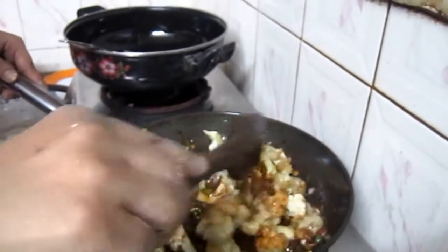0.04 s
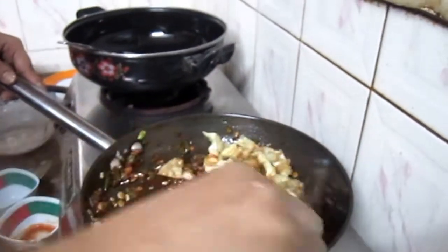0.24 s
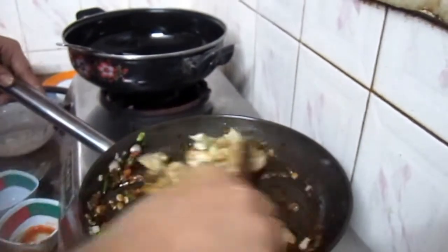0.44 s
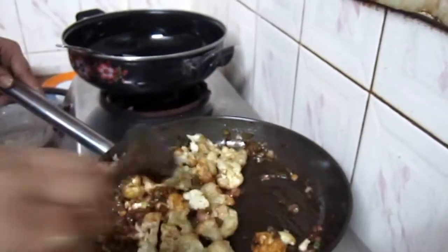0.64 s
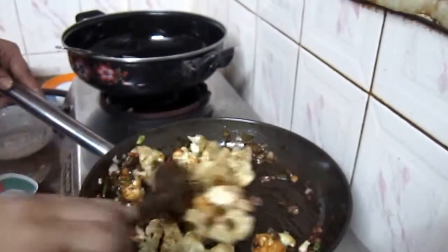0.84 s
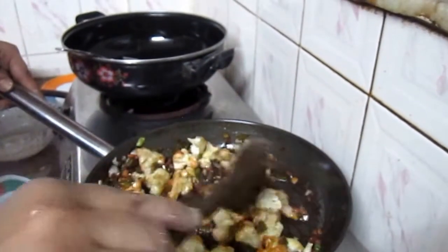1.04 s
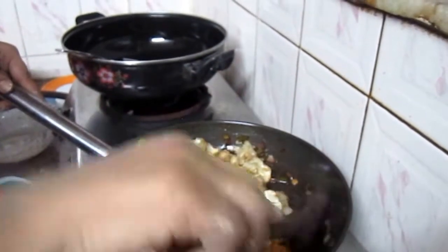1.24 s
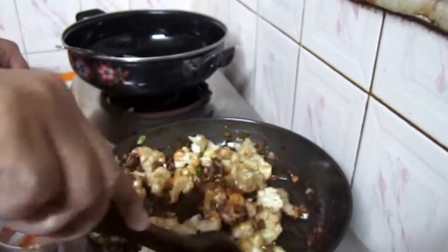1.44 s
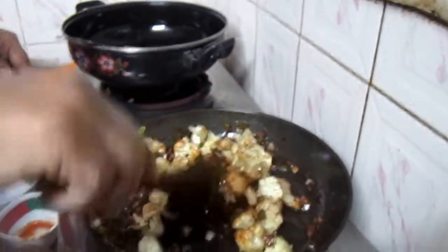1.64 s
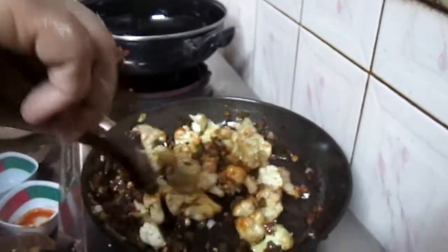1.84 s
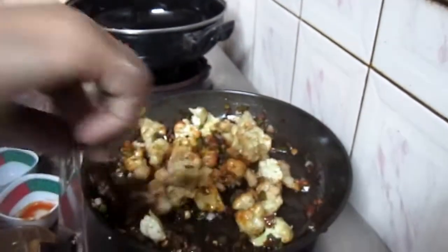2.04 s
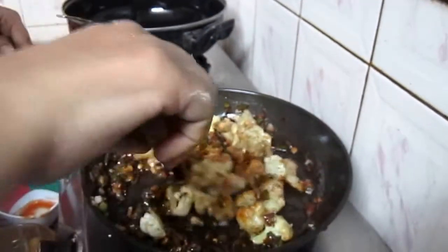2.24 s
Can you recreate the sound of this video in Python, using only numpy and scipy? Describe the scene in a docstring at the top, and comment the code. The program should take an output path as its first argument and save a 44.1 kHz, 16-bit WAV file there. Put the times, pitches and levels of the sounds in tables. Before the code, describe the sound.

Close above a frying pan in a small hard-walled kitchen, a wooden spatula scrapes and shoves damp food, striking the metal three times, the first loudest, over faint sizzle, small oil spits and a low room drone.

```python
"""Spatula in a frying pan

A wooden spatula turns vegetables in a frying pan in a small tiled kitchen. Three knocks: noise bursts
for wood on metal, decaying modes for the ringing pan and its thud on the stand. Strokes of random clicks
make moist rustle, metal scrape and dull shove. Under them lie a faint click sizzle with spits of oil
and steam whistles, and a low drone of filtered noise with wavering tones."""
import sys
import numpy as np
from scipy import signal
from scipy.fft import rfft, irfft
from scipy.io import wavfile

SR = 44100
rng = np.random.default_rng(int(sys.argv[2]) if len(sys.argv) > 2 else 0)


def transcribe(signal):
    """Save signal, clipped to [-1, 1], as a 16-bit WAV file at the path in sys.argv[1]."""
    frames = np.atleast_2d(signal).T
    limited = np.clip(frames, -1, 1)
    pcm = np.round(limited * 32767).astype(np.int16)
    wavfile.write(sys.argv[1], SR, pcm)


N = 101429
T = np.arange(N) / SR

# Bright spectrum of moist food and spitting oil: freq_hz, relative_level_db
RUSTLE_SPECTRUM = [(500, -3), (2000, -20.5), (3800, -13.5), (5500, -3.5), (8000, -8.5), (10500, -10.5),
                   (13000, -16), (16000, -20.5)]


def amp(db):
    """Decibels to gain."""
    return 10 ** (np.asarray(db) / 20)


def unit(x):
    """Scales to an rms of one."""
    return x / np.sqrt(np.mean(x ** 2) + 1e-20)


def read(points, hz):
    """Interpolates a spectrum table on a log-frequency axis."""
    f, value = np.transpose(points)
    return np.interp(np.log(hz + 1), np.log(f + 1), value)


def dying(t, t60_s):
    """Exponential decay, 60 dB down at t60_s."""
    return np.exp(-np.log(1000) * t / t60_s)


def add(mix, start_s, sound):
    """Mixes a sound in at a time, cut at the end of the mix."""
    part = mix[round(start_s * SR):][:len(sound)]
    part += sound[:len(part)]


def colour(x, points, size=4096):
    """Minimum-phase filter with the given spectrum."""
    hz = abs(np.fft.fftfreq(size, 1 / SR))
    log_gain = np.log(amp(read(points, hz)))
    # The Hilbert transform of the log gain gives the causal phase
    taps = np.fft.ifft(np.exp(np.conj(signal.hilbert(log_gain)))).real
    return signal.fftconvolve(x, taps[:size // 2])[:len(x)]


def burst(envelope):
    """Cluster of random-sign clicks under an envelope, with energy one."""
    x = envelope * rng.choice([-1., 1.], len(envelope))
    return x / np.linalg.norm(x)


def narrow(hz, width_hz):
    """Noise in one narrow resonance, width taken at half amplitude, rms one."""
    f = np.fft.rfftfreq(N, 1 / SR)
    gain = 1 / (1 + (2 * (f - hz) / width_hz) ** 2)
    return unit(irfft(rfft(rng.standard_normal(N)) * gain, N))


def grains(points):
    """Dense random clicks of uneven size, coloured, with flickering level, rms one."""
    clicks_per_s, spread_db, flicker_db = 7000, 2.5, 1.0
    size_db = spread_db * np.minimum(rng.exponential(1, N), 4)
    size = amp(size_db) * rng.choice([-1, 1], N)
    clicks = size * (rng.random(N) < clicks_per_s / SR)
    flicker = amp(flicker_db * narrow(0, 50))
    return unit(colour(clicks, points) * flicker)


def kitchen(x):
    """Dense reverberation of the tiles: filtered noise tail, the treble dying first."""
    # Reverberation: freq_hz, t60_s
    room_decay = [(200, .36), (1000, .25), (4000, .25), (8000, .2), (16000, .14)]
    hz, t, z = signal.stft(rng.standard_normal(SR // 2), SR, nperseg=256)
    decay = dying(t, read(room_decay, hz)[:, None])
    tail = signal.istft(z * decay, SR, nperseg=256)[1]
    tail *= np.minimum(T[:len(tail)] / 0.014, 1)  # 14 ms build-up
    return signal.fftconvolve(x, tail / np.linalg.norm(tail))[:N]


def drone():
    """Low background of the kitchen: coloured noise plus narrow-band, hence wavering, tones."""
    # Room background: freq_hz, relative_level_db
    drone_spectrum = [(20, 10), (35, -29.5), (48, -9), (75, 1), (130, -4), (190, -0.5), (245, -4.5),
                      (320, -5), (430, 0), (700, -5.5), (1300, -7.5), (2500, -11), (16000, -97)]
    # Low wavering room tones: pitch_hz, width_hz, level_db
    hums = [(47.7, 11, -65.5), (196, 37, -67.5), (284.5, 8.9, -63.5), (331.7, 13, -60), (423, 32, -61.5)]
    wash = amp(-49.5) * unit(colour(rng.standard_normal(N), drone_spectrum))
    tones = sum(amp(level_db) * narrow(hz, width_hz) for hz, width_hz, level_db in hums)
    return wash + tones


def frying():
    """Bubbles burst as dense clicks; oil spits as short bursts; steam whistles as narrow noise."""
    # Continuous sizzle: freq_hz, relative_level_db
    sizzle_spectrum = [(300, -6.5), (1200, 4), (2200, -8.5), (3800, -1.5), (5800, -4), (7500, -5.5),
                       (10000, -8), (12500, -14.5), (16000, -21.5)]
    # Spits of oil: start_s, level_db
    spits = [(0.8629, -9), (1.462, -14.5), (2.2095, -19)]
    # Thin whistles of escaping steam: start_s, pitch_hz, level_db, t60_s
    whistles = [(0.405, 12100, -51.5, 0.088), (0.478, 11720, -65, .2)]
    spit_decay_s, whistle_rise_s, whistle_width_hz = 0.0008, 0.0014, 120

    out = amp(-51) * grains(sizzle_spectrum)
    t = T[:SR // 4]
    for start_s, level_db in spits:
        spit = colour(burst(np.exp(-t / spit_decay_s)), RUSTLE_SPECTRUM)
        add(out, start_s, amp(level_db) * spit)
    for start_s, hz, level_db, t60_s in whistles:
        envelope = np.minimum(t / whistle_rise_s, 1) * dying(t, t60_s)
        add(out, start_s, amp(level_db) * envelope * narrow(hz, whistle_width_hz)[:len(t)])
    return out


def ring(modes, rise_s, free_share):
    """Sum of decaying modes of alternating sign; all but a free share is quickly damped."""
    damped_t60_s = 0.075
    t = T[:SR // 2]
    damping = free_share + (1 - free_share) * dying(t, damped_t60_s)
    shape = (1 - np.exp(-t / rise_s)) * damping
    total = np.zeros(len(t))
    for k, (hz, t60_s, level_db) in enumerate(modes):
        total += (-1) ** k * amp(level_db) * dying(t, t60_s) * np.sin(2 * np.pi * hz * t)
    return shape * total


def pan_ring(place):
    """Ring of the pan; the place struck sets mode strengths, the resting spatula damps most of it."""
    # Pan modes: pitch_hz
    pan_hz = [978, 1018, 1405, 1461, 1748, 1808, 1860, 2467, 2863, 3109, 3640, 3715, 4034, 4576]
    # Pan mode decays: t60_s
    pan_t60_s = [.2, .235, .25, .25, .2, .2, .18, .2, .17, .2, .18, .2, .13, .18]
    # Pan mode strengths by place struck: relative_level_db
    pan_db = {"wall": [-33, -16, -34, -23.5, -29, -33, -30, -34.5, -21, -36, -22, -30, -28, -34], "floor":
              [-25, -22, -30, -24.5, -31, -27.5, -27, -34, -29, -57, -29, -43, -37, -55], "rim": [-18.5,
              -18, -33, -38, -22, -47, -25, -29.5, -21.5, -49, -59, -50, -43, -47]}
    return ring(zip(pan_hz, pan_t60_s, pan_db[place]), rise_s=0.0021, free_share=0.31)


def stirring():
    """Strokes swell and fade: moist food rustles and tumbles, the blade's scrape excites the pan."""
    # Strokes: peak_s, rise_sigma_s, fall_sigma_s, rustle_db, scrape_db, shove_db
    strokes = [(.04, 0.11, .03, -54, -53.5, -59), (.14, 0.037, 0.033, -55, -55.5, -49),
               (.42, 0.15, 0.12, -60, -52, -62), (0.848, 0.048, 0.035, -58, -52.5, -53),
               (0.906, 0.015, 0.02, -44, -50, -72), (.97, 0.016, 0.15, -53, -55, -52.5),
               (1.56, 0.21, 0.069, -52, -54.5, -64), (1.87, 0.22, 0.21, -52, -56, -52),
               (2.23, 0.091, 0.11, -47.5, -47, -64.5)]
    # Blade along metal: freq_hz, relative_level_db
    scrape_spectrum = [(150, -12.5), (400, -16), (750, 4), (1200, -3), (2000, -1), (2800, 4), (4200, 1),
                       (6000, -7), (16000, -19)]
    # Food shoved against the pan: freq_hz, relative_level_db
    shove_spectrum = [(60, -24), (140, -6), (200, 1), (250, -6.5), (310, -1.5), (450, 1.5), (650, -9.5),
                      (1200, -17.5), (4000, -56)]
    pan_share = 0.23

    rustle, scrape, shove = np.zeros((3, N))
    for peak_s, rise_s, fall_s, rustle_db, scrape_db, shove_db in strokes:
        sigma_s = np.where(T < peak_s, rise_s, fall_s)
        stroke = np.exp(-((T - peak_s) / sigma_s) ** 2 / 2)
        rustle += amp(rustle_db) * stroke
        scrape += amp(scrape_db) * stroke
        shove += amp(shove_db) * stroke
    slips = grains(scrape_spectrum)
    body = unit(signal.fftconvolve(slips, pan_ring("floor"))[:N])
    metal = unit(slips + pan_share * body)
    return rustle * grains(RUSTLE_SPECTRUM) + scrape * metal + shove * grains(shove_spectrum)


def stand_thud(rise_s):
    """Low modes of the loaded pan on its stand, plus a dull noise push of the blow on the food."""
    # Stand modes: pitch_hz
    stand_hz = [200, 289, 454, 497, 526, 601]
    # Stand mode decays: t60_s
    stand_t60_s = [.2, .25, .28, .32, .2, .3]
    # Stand mode strengths: relative_level_db
    stand_db = [-41, -34.5, -36, -35.5, -32.5, -37]
    # Food pushed against the pan: freq_hz, relative_level_db
    push_spectrum = [(60, -24), (140, -6), (200, 1), (250, -6.5), (310, -1.5), (450, 1.5), (650, -9.5),
                     (1200, -17.5), (4000, -56)]
    push_db, push_decay_s = 5, 0.0094
    modes = ring(zip(stand_hz, stand_t60_s, stand_db), rise_s, free_share=1)
    push = colour(burst(np.exp(-T[:SR // 2] / push_decay_s)), push_spectrum)
    return modes + amp(push_db) * push


def wood_contact(crack_db, clatter_db, contact_hz):
    """Wood on metal: sharp crack and dense clatter, low-passed by the cushioning of the contact."""
    # First crack of wood: freq_hz, relative_level_db
    crack_spectrum = [(200, -35), (1000, -5.5), (2200, -15), (3100, -6.5), (3700, -6), (4100, -5.5),
                      (4700, -16), (6800, -24.5), (8000, -49), (16000, -43)]
    # Dense clatter after it: freq_hz, relative_level_db
    clatter_spectrum = [(100, -19.5), (200, -11), (370, -12), (550, -1), (780, -9), (1150, 1), (2200, -7.5),
                        (2900, 0.5), (4300, -8.5), (5000, -9), (6800, -13.5), (8000, -20.5), (16000, -31)]
    crack_s = 0.00096  # the crack envelope peaks at half of this
    clatter_rise_s, clatter_t60_s = 0.0011, 0.05
    t = T[:SR // 2]
    crack = colour(burst(t * np.exp(-2 * t / crack_s)), crack_spectrum)
    clatter_envelope = (1 - np.exp(-t / clatter_rise_s)) * dying(t, clatter_t60_s)
    clatter = colour(burst(clatter_envelope), clatter_spectrum)
    both = amp(20.5 + crack_db) * crack + amp(13.5 + clatter_db) * clatter
    return signal.lfilter(*signal.butter(2, contact_hz, fs=SR), both)


def knocks():
    """Wood cracks on metal, the pan rings and thuds; early echoes and kitchen reverberation follow."""
    # Knocks: start_s, ring_db, crack_db, clatter_db, thud_db, thud_rise_s, contact_cutoff_hz, place
    knock_table = [(0.2134, 2, 1.5, -1, 0, .014, 7300, "wall"),
                   (1.2296, -9.5, -12.5, -12.5, 4, 0.024, 3200, "floor"),
                   (1.9898, -6, -13.5, -8.5, -10, 0.0076, 4420, "rim")]
    # First reflections from tiles and stove: delay_s, gain
    echoes = [(.0023, 0.25), (.0049, 0.27), (.0098, .15)]
    ring_wet_db, thud_wet_db, crack_wet_db = -12, -9, -6.5

    tones, thuds, cracks = np.zeros((3, N))
    for start_s, ring_db, crack_db, clatter_db, thud_db, thud_rise_s, contact_hz, place in knock_table:
        add(tones, start_s, amp(ring_db) * pan_ring(place))
        add(thuds, start_s, amp(thud_db) * stand_thud(thud_rise_s))
        contact = wood_contact(crack_db, clatter_db, contact_hz)
        add(cracks, start_s, contact)
        for delay_s, gain in echoes:
            add(cracks, start_s + delay_s, gain * contact)
    send = amp(ring_wet_db) * tones + amp(thud_wet_db) * thuds + amp(crack_wet_db) * cracks
    return tones + thuds + cracks + kitchen(send)


def scene():
    """Everything reaches one microphone above the pan, sent to two equal channels."""
    food_wet_db = -13
    food = stirring() + frying()
    mono = knocks() + food + amp(food_wet_db) * kitchen(food) + drone()
    return np.array([mono, mono])


def record(dry):
    """The recorder's band limit: a steep linear-phase low-pass."""
    edge_hz = 15850
    taps = signal.firwin(511, edge_hz, window=("kaiser", 9), fs=SR)
    return signal.oaconvolve(dry, taps[None], "same")


dry = scene()
out = record(dry)
transcribe(out)
```